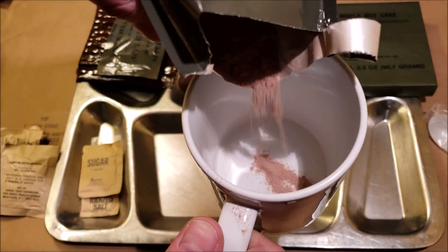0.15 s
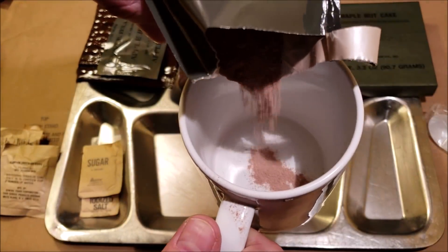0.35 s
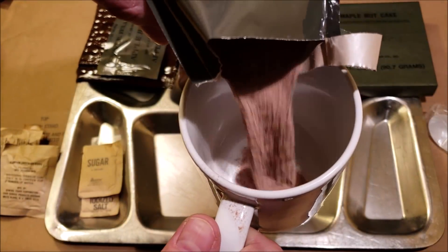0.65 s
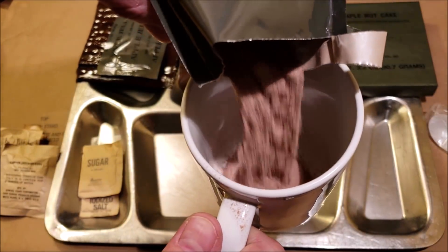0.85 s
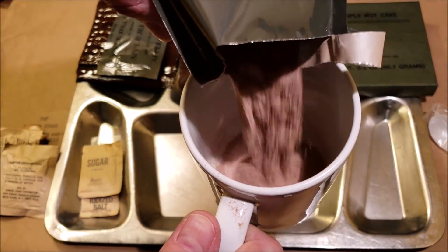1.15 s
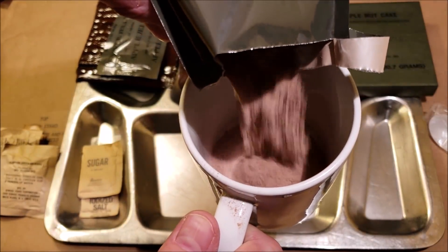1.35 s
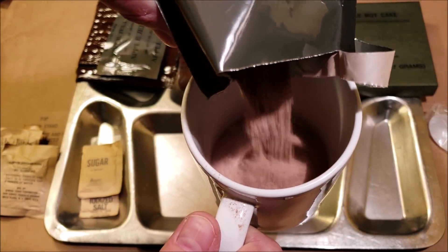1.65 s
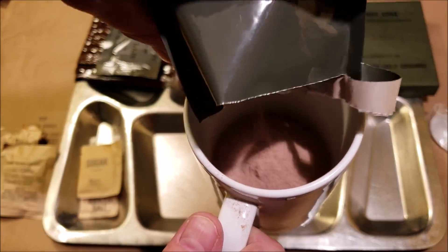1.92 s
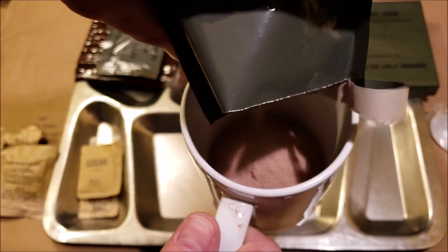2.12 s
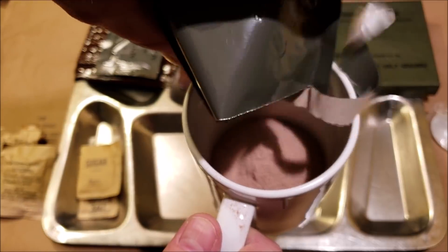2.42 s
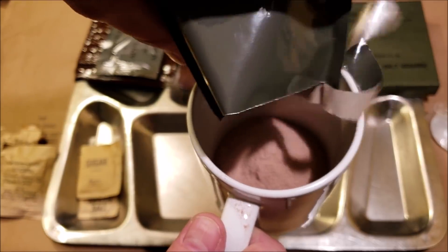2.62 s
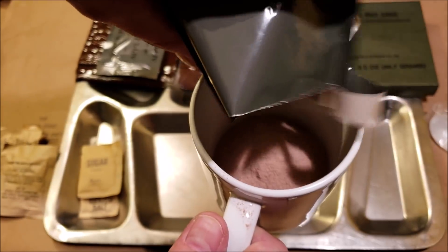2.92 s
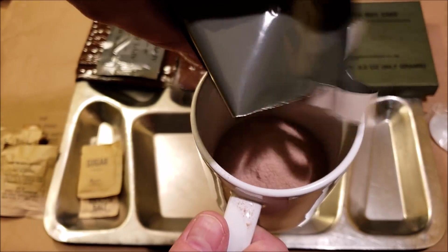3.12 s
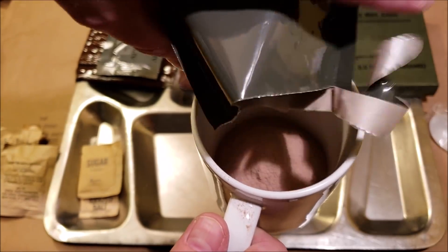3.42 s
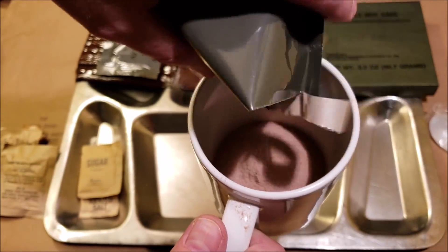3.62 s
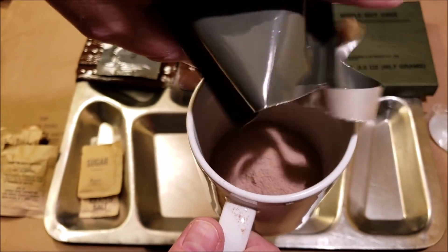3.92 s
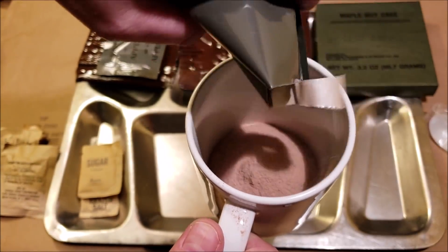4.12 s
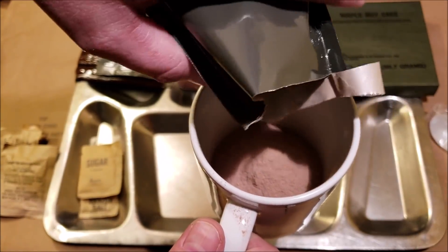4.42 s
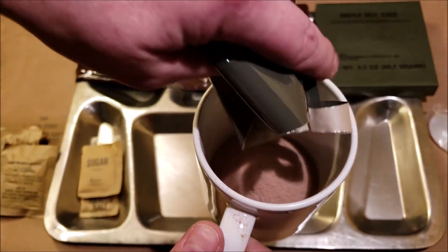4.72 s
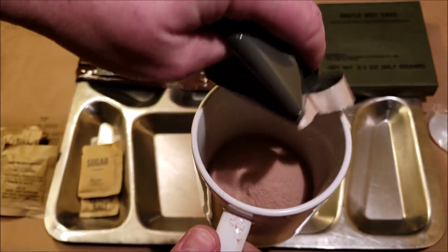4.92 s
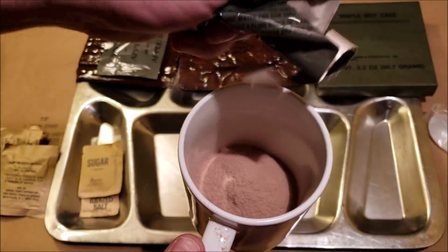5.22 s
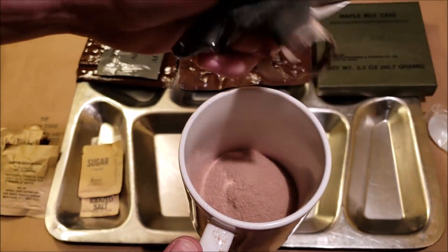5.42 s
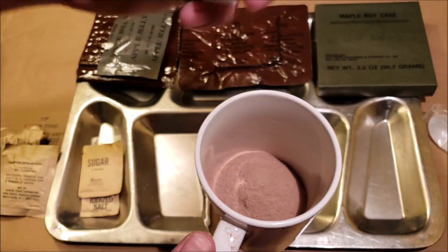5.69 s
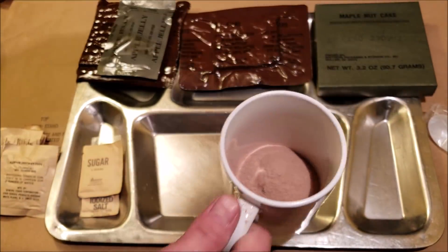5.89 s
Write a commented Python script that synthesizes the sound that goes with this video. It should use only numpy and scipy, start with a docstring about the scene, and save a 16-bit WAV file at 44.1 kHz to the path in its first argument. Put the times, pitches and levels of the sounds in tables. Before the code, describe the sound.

Close up and in stereo, a smooth hiss of fine powder surges twice and thins away over a low, quiet room tone. After a tiny pause, a foil packet is tapped and flexed above a cup: muffled thumps, hollow knocks and crisp separate crackles. The crackling thickens, pauses briefly, then becomes a sharp, high, busy crumpling that continues to the end, the cup's hollow colour fading as the packet moves away.

```python
"""A low, quiet room tone comes first, with one faint crease tick; then a soft bright hiss as fine powder slides
out of a foil packet into a cup. Fingers then tap the packet and crumple it: dull thumps, sharp snaps, fine rustle.
Room and powder are coloured noise, the powder with a hollow cup resonance; taps ring the packet's air and the cup.
Snaps are noise bursts with a crack, ringing foil and cup; rustle is clumps of random clicks. Echoes follow both."""
import sys
import numpy as np
from scipy import signal
from scipy.fft import rfft, irfft
from scipy.io import wavfile

SR = 44100
rng = np.random.default_rng(int(sys.argv[2]) if len(sys.argv) > 2 else 0)


def master_out(mix):
    """Clip the mix to full scale and print it as 16-bit PCM to the path in sys.argv[1]."""
    frames = np.transpose(np.atleast_2d(mix))
    ceiling = np.clip(frames, -1, 1)
    pcm = np.round(ceiling * 32767).astype(np.int16)
    wavfile.write(sys.argv[1], SR, pcm)


N = 266837   # length in samples

# low room tone, sinking towards the end: t/s, level/dB
ROOM_LEVEL = [(0, -66.5), (2, -65.5), (4, -61.5), (5, -67.5), (6.05, -70.5)]
# colour of the room tone: f/Hz, relative level/dB per Hz
ROOM_SPECTRUM = [(15, -45), (25, -17.5), (64, -3.5), (91, -19.5), (113, -7), (204, -11.5), (275, -21.5),
                 (390, -13.5), (434, -23.5), (510, -23), (553, -25.5), (705, -17), (764, -22.5),
                 (1580, -38.5), (15600, -44)]
# how alike left and right are in steady noise: f/Hz, likeness/ratio
STEREO_LIKENESS = [(60, 0.93), (300, 0.58), (1000, 0.067), (3000, 0.12), (12000, 0.031)]
# powder stream that starts, surges, falters, runs and thins out: t/s, hiss level/dB
POUR_LEVEL = [(0.36, -88), (0.41, -75), (0.48, -73.5), (0.58, -57.5), (0.68, -55), (0.8, -60), (0.966, -64),
              (1.1, -57), (1.62, -63), (1.756, -67), (1.85, -83), (1.92, -94)]
# colour of the powder hiss: f/Hz, relative level/dB per Hz
POWDER_SPECTRUM = [(880, -13.5), (1500, -16), (1610, -14), (2130, -15.5), (2920, -12), (3960, -11.5),
                   (5010, -7), (5470, -10.5), (6270, -7.5), (7120, -9.5), (7780, -12.5), (10000, -9),
                   (12500, -4), (15100, -4), (15600, -3.5)]
# fingers tapping the packet: t/s, thump level/dB, cup ring level/dB
FINGER_TAPS = [(2.044, -39, -39), (2.118, -53, -43), (2.276, -38.5, -36.5), (2.477, -41, -45),
               (2.668, -37, -37.5), (2.908, -43, -41), (3.091, -34.5, -38), (3.152, -50, -38.5),
               (3.322, -44, -31.5), (3.763, -56.5, -44), (3.847, -40, -28.5), (3.968, -55, -32.5),
               (4.095, -61, -36), (4.135, -46.5, -33), (4.704, -56, -43), (4.84, -53, -36),
               (5.046, -53, -38), (5.085, -53, -34.5)]
# resonances of the air in the packet: f/Hz, relative level/dB, t60/s
PACKET_AIR_MODES = [(121, -12.5, 0.19), (174, 3.5, 0.054), (325, 2.5, 0.076)]
# the squeezed packet holds less air and sounds higher: t/s, pitch/ratio
PACKET_PITCH_RISE = [(3.1, 1.03), (3.8, 1.22), (5.1, 1.45)]
# foil working between the snaps: t/s, rustle level/dB
RUSTLE_LEVEL = [(2.0, -95), (2.08, -67), (2.22, -75.5), (2.38, -70), (2.7, -76.5), (3.21, -75), (3.4, -62),
                (3.54, -61), (3.7, -57.5), (4.05, -66.5), (4.16, -47.5), (4.47, -80.5), (4.65, -65),
                (4.76, -51), (4.82, -68), (4.88, -59), (5.25, -52), (5.6, -59), (5.78, -68), (6.05, -54.5)]
# treble of the rustle over its body: t/s, level/dB
RUSTLE_TREBLE = [(2.0, -0.5), (3.2, -4), (3.4, -2.5), (4.2, -7.5), (4.7, 1), (5.0, 3), (5.6, 4), (6.05, -3)]
# packet hangs in the mouth of the cup, then is lifted away: t/s, level of cup excitation/dB
OVER_CUP = [(2.0, -13.5), (3.0, -22), (3.6, -17), (4.2, -17), (4.6, -17.5), (5.3, -27), (6.05, -35.5)]
# creases that snap: t/s, body peak level/dB, pitch f/Hz, treble peak level/dB, burst decay/ms
CREASE_SNAPS = [(0.2242, -54.5, 1200, -78, 6.2), (2.026, -53, 1680, -66, 6),
                (2.0486, -25, 1160, -34.5, 1.7), (2.1076, -33, 1960, -66, 0.72),
                (2.1238, -39, 1570, -67, 8), (2.156, -31, 1630, -32, 2.5), (2.2795, -27.5, 1480, -34, 2.3),
                (2.3468, -39.5, 1700, -71, 2.4), (2.367, -45, 3380, -67, 2.6), (2.472, -46, 1610, -65, 6),
                (2.484, -36, 1090, -45, 4.7), (2.4945, -25, 1490, -29.5, 1.7),
                (2.5371, -27, 1630, -53, 4.1), (2.5482, -37.5, 2070, -43, 7.3),
                (2.593, -25.5, 1600, -68, 0.43), (2.6735, -29, 1210, -45, 5),
                (2.7087, -28.5, 1750, -43, 2.8), (2.754, -40.5, 1870, -44, 3),
                (2.7753, -27.5, 1650, -62, 2.1), (2.9133, -30, 1260, -48, 5.2),
                (2.9568, -38, 1170, -74, 4.6), (2.9799, -30.5, 1840, -43, 7.5),
                (2.9897, -24, 1720, -66, 1.3), (3.08, -47, 1510, -60, 2.3), (3.0949, -21.5, 1710, -39, 4.1),
                (3.153, -33, 3460, -48, 11), (3.161, -29, 3520, -56, 1.2), (3.1849, -29.5, 1460, -65, 2.6),
                (3.2085, -40.5, 1690, -52, 3.2), (3.3161, -34.5, 1670, -58, 5.2),
                (3.3299, -23.5, 3700, -29, 8.1), (3.3506, -25, 1300, -32, 12),
                (3.3721, -20, 1270, -23, 3.3), (3.403, -33, 1220, -53, 2.5), (3.415, -23, 1270, -51, 3.7),
                (3.4452, -32.5, 1980, -62, 1.2), (3.4703, -22.5, 4400, -24, 3.8),
                (3.4835, -28, 1200, -25.5, 2.9), (3.542, -32.5, 2900, -58, 1.4),
                (3.6249, -29, 1140, -53, 1.5), (3.6734, -23, 2900, -20.5, 2.5),
                (3.694, -17.5, 2500, -24, 2.5), (3.7642, -30, 1620, -46, 0.77),
                (3.778, -25, 1230, -26.5, 2.3), (3.8468, -32, 1830, -49, 3.5),
                (3.854, -20.5, 1070, -28, 9.6), (3.8776, -21, 2060, -28, 16), (3.8856, -13, 5400, -16, 1.2),
                (3.9715, -24, 4570, -30, 1.9), (3.9882, -25, 2800, -33, 5.7),
                (4.0362, -21, 3580, -22.5, 3.2), (4.0626, -29.5, 1620, -60, 2.4),
                (4.0996, -20.5, 920, -16.5, 2.4), (4.127, -25, 1000, -23, 7.7),
                (4.1375, -22.5, 1500, -16.5, 13), (4.143, -21, 1710, -36, 7),
                (4.162, -22.5, 2000, -31, 2.6), (4.1757, -18, 6200, -16, 4.2),
                (4.1968, -22.5, 3700, -20.5, 4.3), (4.3033, -39, 1470, -61, 6),
                (4.337, -34, 4480, -31.5, 5), (4.353, -29, 4700, -30, 4.6), (4.3811, -28.5, 2030, -45, 4.4),
                (4.4299, -28, 1620, -30, 3.2), (4.5196, -37.5, 1230, -44, 4),
                (4.558, -33.5, 3580, -53, 1.6), (4.6158, -27.5, 2800, -35, 4.3),
                (4.6848, -34.5, 1610, -46, 4.1), (4.6966, -29, 2590, -23, 7.3),
                (4.7066, -17.5, 4950, -12.5, 2), (4.7115, -15, 2860, -37, 3), (4.75, -24.5, 2710, -31, 9),
                (4.838, -33, 3400, -28, 2.1), (4.8471, -18, 2160, -19.5, 4.4),
                (4.8655, -28, 3340, -27.5, 18.5), (4.9185, -26, 3180, -24, 6.3),
                (4.9459, -29.5, 2740, -50, 1.9), (4.9891, -25.5, 3100, -15, 2.1),
                (5.003, -26.5, 3100, -16, 2), (5.02, -23.5, 5600, -27, 4.1), (5.0542, -13, 2330, -28, 1.8),
                (5.0785, -20.5, 2550, -21, 1.8), (5.0971, -18.5, 2250, -11, 5.4),
                (5.111, -26, 2050, -41, 2.7), (5.1552, -29, 2180, -31, 4.3), (5.158, -17.5, 2130, -23, 3.7),
                (5.211, -31, 3100, -36, 4.1), (5.228, -16, 6200, -31, 1.5),
                (5.2362, -20.5, 4840, -16.5, 3.3), (5.2497, -25.5, 1930, -36, 3.2),
                (5.2625, -28.5, 3220, -26.5, 3), (5.295, -22, 2420, -16.5, 4.2),
                (5.3218, -23.5, 5400, -20, 3.1), (5.3642, -27.5, 2900, -31, 4.3),
                (5.3817, -26, 1780, -37, 1.6), (5.397, -22.5, 2540, -44, 0.53),
                (5.425, -16.5, 1690, -22, 0.61), (5.4346, -21, 2370, -14, 1),
                (5.4441, -25.5, 2450, -15.5, 3.5), (5.461, -22.5, 2550, -32, 1.4),
                (5.485, -31.5, 3000, -23, 4.5), (5.514, -25.5, 1920, -47, 1.4),
                (5.5361, -24, 1780, -16.5, 1.8), (5.5685, -30.5, 4170, -39, 3.4),
                (5.624, -31, 2270, -48, 1.5), (5.6354, -30, 2020, -23, 4.3), (5.667, -21, 2580, -33, 0.71),
                (5.699, -19, 4200, -16, 2.5), (5.739, -24.5, 2380, -24, 2.5),
                (5.7543, -23.5, 5230, -20, 2.3), (5.7656, -16, 3300, -18, 0.82),
                (5.787, -25, 2760, -15, 1.8), (5.837, -31, 4220, -32, 3.7), (5.874, -25, 3170, -29, 2.9),
                (5.888, -22.5, 4870, -25, 1.4), (5.9221, -19.5, 5000, -16, 2.5),
                (5.9924, -24.5, 3900, -21, 2.5), (6.0086, -27.5, 4570, -21, 7.6)]
# ringing modes of the foil sheet: f/Hz, relative level/dB, t60/s
FOIL_MODES = [(1240, -20, .008), (1620, -20, .01), (1900, -20, .008), (2250, -21, .008), (2660, -21, .008),
              (3100, -22, .008), (3950, -22, .008), (4900, -24, .006), (6200, -24, .006)]
# how the microphones shade the packet: f/Hz, left-minus-right level/dB
MIC_SHADOW = [(300, 4), (950, -5), (2400, -3), (5000, -10), (9000, -3.5), (14000, -9)]

CUP_HZ, CUP_T60_S = 779, 0.038
CUP_DB_PER_OCTAVE = -2.5      # small, high creases stir the cup less
RUSTLE_CUP_DB = 14.5          # added to OVER_CUP for the rustle
POWDER_PAN_DB = -6            # left over right, so the hiss leans right
SNAP_PAN_DB, SNAP_PAN_SPREAD_DB = 2, 1.5
LEAD_IN_S = .008              # faint noise swells just before each snap
CRACK, TREBLE_CRACK = 16.1, 6.6   # click heights for a 1 ms burst; the second is extra, in the treble only
TAIL_T60_S, TAIL_DB = 0.14, -12.5
LEFT_LEAD_S = 4e-5
CUTOFF_HZ = 15950


def amp(db):
    """dB to gain."""
    return 10 ** (np.asarray(db) / 20)


def rms_one(x):
    """Scale to rms 1."""
    return x / np.sqrt(np.mean(x ** 2) + 1e-20)


def peak_one(x):
    """Scale to peak 1."""
    return x / (np.abs(x).max() + 1e-20)


def at_time(points, s):
    """Read a two-column curve at one moment."""
    return np.interp(s, *np.transpose(points))


def in_time(points):
    """Read a two-column curve at every sample."""
    return at_time(points, np.arange(N) / SR)


def at_hz(points, hz):
    """Read a spectrum on a log frequency axis."""
    f, values = np.transpose(points)
    return np.interp(np.log(hz), np.log(f), values)


def fft_hz():
    """Frequencies of the full-length spectrum, kept above zero for the log axis."""
    return np.maximum(np.fft.rfftfreq(N, 1 / SR), 1)


def band(x, low_hz, high_hz):
    """Butterworth band-pass."""
    return signal.sosfilt(signal.butter(2, [low_hz, high_hz], "band", fs=SR, output="sos"), x)


def drift(rate_hz):
    """Slow random wander of rms 1: low-passed noise made at 1/40 of the sample rate."""
    r = np.exp(-80 * np.pi * rate_hz / SR)
    noise = rng.standard_normal(N // 40 + 2002)
    slow = signal.lfilter([1], [1, -2 * r, r * r], noise)[2000:]   # skip the filter's start
    return np.interp(np.arange(N) / 40, np.arange(len(slow)), rms_one(slow))


def ring(x, hz, t60):
    """Two-pole resonator: a unit click starts a decaying sine of about unit height."""
    r, w = amp(-60 / (t60 * SR)), 2 * np.pi * hz / SR
    return signal.lfilter([0, np.sin(w)], [1, -2 * r * np.cos(w), r * r], x + 1e-18)


def panned(pan_db):
    """Left and right gains."""
    return amp([[pan_db / 2], [-pan_db / 2]])


def add(out, sound, s):
    """Mix a short sound in at time s."""
    i = round(s * SR)
    out[:, i:i + sound.shape[1]] += sound[:, :N - i]


def coloured_noise(spectrum):
    """Steady stereo noise of rms 1 with the given spectrum and a left-right likeness set by frequency."""
    hz = fft_hz()
    mid, side = rfft(rng.standard_normal((2, N)))
    alike = np.clip(at_hz(STEREO_LIKENESS, hz), -1, 1)
    pair = np.sqrt(1 + alike) * mid + np.sqrt(1 - alike) * side * [[1], [-1]]
    return rms_one(irfft(pair * amp(at_hz(spectrum, hz)), N))


def room_tone():
    """Low coloured noise whose level wanders a little and sinks towards the end."""
    return amp(in_time(ROOM_LEVEL) + 1.5 * drift(4.6)) * coloured_noise(ROOM_SPECTRUM)


def tail(x):
    """Quick diffuse echoes from cup, tray and table; the treble dies slightly sooner."""
    t = np.arange(SR // 4) / SR
    noise = rng.standard_normal((2, len(t))) * np.minimum(t / 0.00019, 1)
    dull = band(noise, 230, 7200) * amp(-60 * t / TAIL_T60_S)
    bright = band(noise, 7000, 11700) * amp(-60 * t / (0.97 * TAIL_T60_S))
    echoes = amp(TAIL_DB) * rms_one(dull + bright) / np.sqrt(len(t))
    return signal.fftconvolve(x, echoes, axes=1)[:, :N]


def shaded(x):
    """Each microphone hears the packet with its own colour and a hair apart in time."""
    hz = fft_hz()
    half = np.array([[.5], [-.5]])
    colour = amp(at_hz(MIC_SHADOW, hz) * half)
    lead = np.exp(2j * np.pi * hz * LEFT_LEAD_S * half)
    return irfft(rfft(x) * colour * lead, N)


def powder():
    """Countless grains sliding over foil merge into a smooth hiss that swells with the flow and stirs the cup."""
    fade_in, fade_out = (POUR_LEVEL[0][0] - .1, -110), (POUR_LEVEL[-1][0] + .05, -110)
    hiss_db = in_time([fade_in] + list(POUR_LEVEL) + [fade_out])
    hollow = rms_one(band(ring(rng.standard_normal(N), CUP_HZ, CUP_T60_S), 550, 860))
    stream = coloured_noise(POWDER_SPECTRUM) * panned(POWDER_PAN_DB) + amp(-20.5) * hollow
    return amp(hiss_db + 0.56 * drift(28)) * stream


def cup(x, hz):
    """The air in the cup answers with a short hollow note on a broad hump; peak 1."""
    return peak_one(band(ring(x, hz, CUP_T60_S), 200, 2800) + 20.0 * band(x, 266, 1530))


def taps():
    """A soft fingertip pushes the air in the packet, and the jolt sounds the cup below."""
    t, out = np.arange(8192) / SR, np.zeros((2, N))
    both = np.ones((2, 1))
    push = t * np.exp(-t / 0.0011)
    for s, thump_db, cup_db in FINGER_TAPS:
        strengths = amp(rng.normal(0, 0.8, len(PACKET_AIR_MODES)))
        rise = at_time(PACKET_PITCH_RISE, s)
        air = sum(strength * amp(db) * ring(push, hz * rise, t60)
                  for strength, (hz, db, t60) in zip(strengths, PACKET_AIR_MODES))
        thump = peak_one(band(band(air, 65, 1140), 72, 850))
        add(out, amp(thump_db) * thump * both, s + 0.0024)
        jolt = rng.standard_normal(len(t)) * np.exp(-t / 0.0054)
        cup_note = cup(jolt, CUP_HZ * np.exp(rng.normal(0, 0.052)))
        add(out, amp(cup_db) * cup_note * both, s + 0.0056)
    return out


def rustle():
    """Tiny foil crackles come in clumps, most faint and a few sharp, and stir the cup."""
    cracks_per_s = 2500 * amp(7.0 * drift(60) + 4.0 * drift(12))
    born = rng.random(N) < cracks_per_s / SR
    heights = amp(4.3 * np.minimum(rng.exponential(1, N), 4))
    cracks = born * heights * rng.standard_normal((3, N))
    ears = 0.55 * cracks[0] + cracks[1:]   # one shared channel and one for each side
    body = rms_one(band(band(ears, 1170, 4960), 1180, 11600))
    treble = amp(in_time(RUSTLE_TREBLE)) * rms_one(band(cracks[1:], 11400, 19845))
    hollow = amp(RUSTLE_CUP_DB + in_time(OVER_CUP)) * rms_one(cup(cracks[0], CUP_HZ))
    started = np.arange(N) > RUSTLE_LEVEL[0][0] * SR
    return amp(in_time(RUSTLE_LEVEL)) * started * (body + treble + hollow)


def snaps():
    """A crease lets go with one crack in a gritty burst of noise, heard through foil and cup."""
    t, out = np.arange(4096) / SR - LEAD_IN_S, np.zeros((2, N))
    after = np.maximum(t, 0)
    snap_i = round(LEAD_IN_S * SR)
    for s, peak_db, pitch_hz, treble_db, burst_ms in CREASE_SNAPS:
        cup_db = peak_db + at_time(OVER_CUP, s) + CUP_DB_PER_OCTAVE * np.log2(pitch_hz / 2000)
        pan_db = rng.normal(SNAP_PAN_DB, SNAP_PAN_SPREAD_DB)

        lead_in = amp(-18.5) * np.exp(np.minimum(t, 0) / 0.0053) * (t < 0)
        burst = np.exp(-1000 * after / burst_ms) * np.minimum(after / 0.00081, 1)
        # a short, uneven noisy tail after each snap
        lumps = np.repeat(rng.standard_normal(64), 64)
        own_tail = amp(-9.5 + 3.6 * lumps) * np.exp(-after / 0.014) * (t >= 0)
        grit = rng.standard_normal((3, len(t))) * amp(5.0 * rng.standard_normal(len(t)))
        spray = grit * (lead_in + burst + own_tail)
        # shorter bursts crack harder
        spray[:, snap_i + rng.integers(20, 50)] += CRACK / np.sqrt(burst_ms)
        fine = spray[1:].copy()
        fine[:, snap_i + 24] += TREBLE_CRACK / np.sqrt(burst_ms)
        ears = 0.65 * spray[0] + spray[1:]   # the two microphones face different facets of the foil

        # the sheet's modes shift as it bends; those near the pitch of the crease are favoured
        bends = np.exp(.06 * rng.standard_normal(len(FOIL_MODES)))
        luck_db = 3.0 * rng.standard_normal(len(FOIL_MODES))
        modes = 0
        for bend, extra_db, (hz, db, t60) in zip(bends, luck_db, FOIL_MODES):
            mode_db = db + extra_db - 2.0 * abs(np.log2(hz / pitch_hz))
            modes = modes + amp(mode_db) * ring(ears, hz * bend, t60)

        crack = 2.64 * band(ears, pitch_hz / 1.3, pitch_hz * 1.3) + 1.14 * band(ears, .6 * pitch_hz, 4800)
        body = band(modes + crack, .45 * pitch_hz, 13900)   # a small crease radiates little bass
        fading = (fine + 0.067 * spray[0]) * np.exp(-after / 0.067)
        treble = band(band(fading, 3330, 17900), 9300, 19845)
        hollow = cup(spray[0] + 0.12 * spray[1:], CUP_HZ * bends[0])
        sound = amp(peak_db) * peak_one(body) + amp(cup_db) * hollow + amp(treble_db) * peak_one(treble)
        add(out, sound * panned(pan_db), s - LEAD_IN_S)
    return out


def scene():
    """Room tone, powder and taps around the crumpling packet and its echoes."""
    packet = snaps() + rustle()
    return room_tone() + powder() + taps() + shaded(packet + tail(packet))


def record(dry):
    """A steep elliptic low-pass cuts the top."""
    return signal.sosfilt(signal.ellip(12, .5, 70, CUTOFF_HZ, fs=SR, output="sos"), dry)


dry = scene()
out = record(dry)
master_out(out)
```